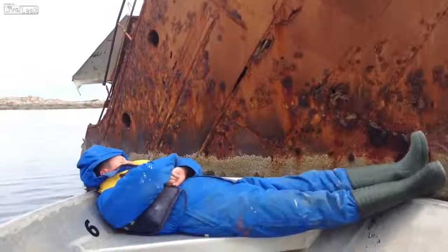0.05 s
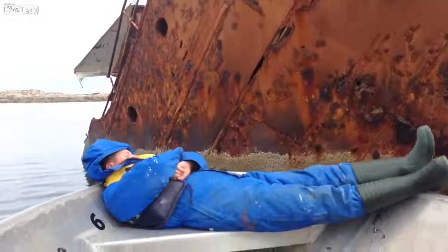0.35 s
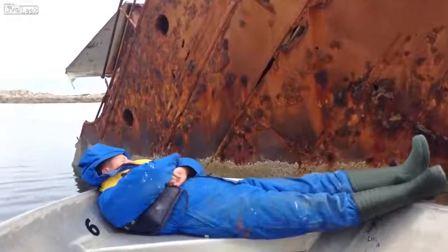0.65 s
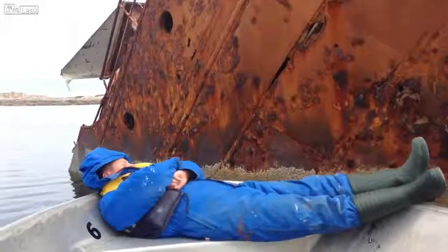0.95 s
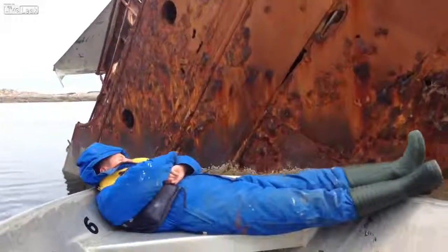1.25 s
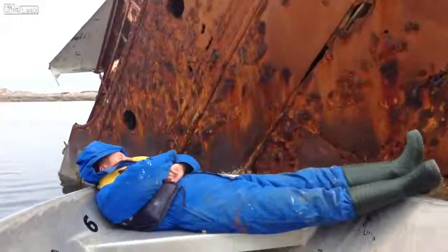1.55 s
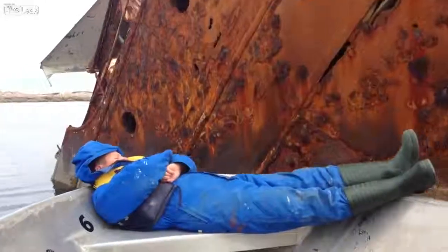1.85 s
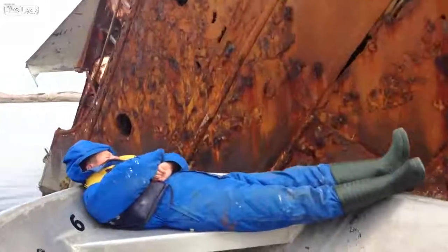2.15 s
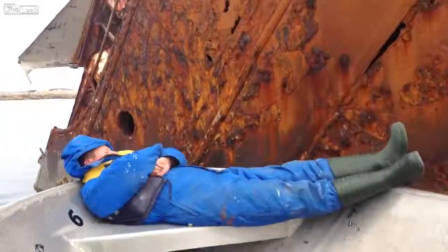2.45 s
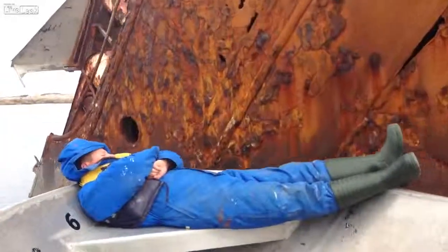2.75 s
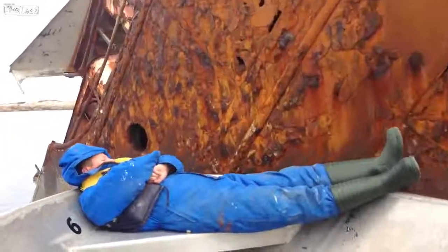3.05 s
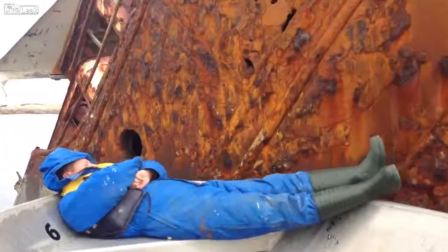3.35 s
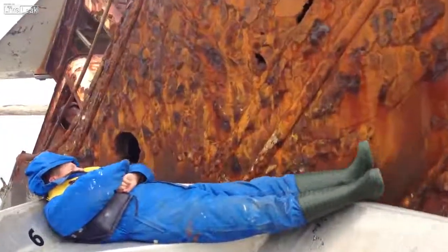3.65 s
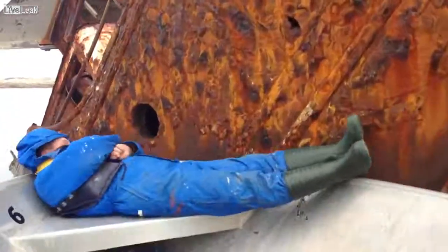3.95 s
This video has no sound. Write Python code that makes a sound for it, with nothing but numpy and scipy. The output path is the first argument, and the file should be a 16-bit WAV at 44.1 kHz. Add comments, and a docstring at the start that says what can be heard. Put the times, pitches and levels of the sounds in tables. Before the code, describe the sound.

A small outboard motor rumbles at idle, swells briefly, then ticks over with a faint chirp. Water slaps and splashes the sides. At the end the metal boat booms against a steel hull and scrapes, heard from on board.

```python
"""On open water beside a rusty steel hull, inside a small aluminium boat that is creeping up to it.
The idling outboard shakes the boat's panels, swells briefly and churns the water, then ticks over
with a faint chirp each turn. Water splashes, slaps and bubbles along the sides. Near the end the bow
strikes the hull: the boat booms and its edge grinds along the rust, snapping off flakes."""
import sys
import numpy as np
from scipy import signal
from scipy.io import wavfile
from scipy.ndimage import uniform_filter1d

SR = 44100
rng = np.random.default_rng(int(sys.argv[2]) if len(sys.argv) > 2 else 0)


def file_out(sig):
    """Save sig as 16-bit WAV at sys.argv[1]."""
    # one column per channel
    cols = np.atleast_2d(sig).T
    # limit, then scale
    lim = np.clip(cols, -1, 1)
    pcm = np.round(lim * 32767).astype(np.int16)
    wavfile.write(sys.argv[1], SR, pcm)


N = 176400
T = np.arange(N) / SR


def amp(db):
    """Decibels to gain."""
    return 10 ** (np.asarray(db) / 20)


def unit(x):
    """Scales to rms 1."""
    return x / np.sqrt(np.mean(x ** 2) + 1e-20)


def steady(x):
    """Rides out slow swings of level, holding the rms near 1."""
    return x / np.sqrt(abs(uniform_filter1d(x ** 2, size=5000)) + 1e-20)


def curve(points):
    """Automation lane: straight lines between (seconds, value) points."""
    return np.interp(T, *np.transpose(points))


def noise():
    """White noise."""
    return rng.standard_normal(N)


def wobble(samples):
    """Random modulation of rms 1, smoothed over this many samples."""
    return unit(uniform_filter1d(noise(), samples))


def grains(per_s, spread_db):
    """Random clicks of uneven size, at rms 1."""
    size = amp(spread_db * np.minimum(rng.exponential(1, N), 4))
    return unit(size * rng.choice([-1, 1], N) * (rng.random(N) < per_s / SR))


def burst(start, fade_s, rise_s):
    """Envelope with a straight attack and an exponential fade."""
    t = np.maximum(T - start, 0)
    return np.minimum(t / rise_s, 1) * np.exp(-np.maximum(t - rise_s, 0) / fade_s)


def ping(start, hz, fade_s, rise_s):
    """A struck sine that dies away."""
    return burst(start, fade_s, rise_s) * np.sin(2 * np.pi * hz * (T - start))


def eq(x, points):
    """Minimum-phase EQ of unit energy: the (Hz, dB) points set only the tone."""
    size = 8192
    hz, db = np.transpose(points)
    bins_hz = abs(np.fft.fftfreq(size, 1 / SR))
    log_gain = np.log(amp(np.interp(np.log(bins_hz + 1), np.log(hz), db)))
    taps = np.fft.ifft(np.exp(np.conj(signal.hilbert(log_gain)))).real[:size // 2]
    return signal.oaconvolve(x, taps / np.linalg.norm(taps))[:N]


def resonate(x, hz, width_hz):
    """One resonance of gain 1."""
    r = np.exp(-np.pi * width_hz / SR)
    return 2 * signal.lfilter([1 - r], [1, -r * np.exp(2j * np.pi * hz / SR)], x).real


def band(x, hz, width_hz):
    """The same resonance twice, for steeper skirts."""
    return resonate(resonate(x, hz, width_hz), hz, width_hz)


def plating(x, t60_s=0.097, wet_db=-8.5):
    """Adds the dense, short ring of the boat's thin sheet metal."""
    t = T[:8000]
    tail = rng.standard_normal(len(t)) * amp(-60 * t / t60_s)
    wet = signal.oaconvolve(x, tail / np.linalg.norm(tail))[:N]
    return (x + amp(wet_db) * wet) / np.hypot(1, amp(wet_db))


# How hard the motor works. Each row: time in seconds, rumble level in dB.
MOTOR_EFFORT = [(0, -45.5), (.3, -45.5), (.65, -42.5), (.74, -26), (1.0, -30), (1.18, -29.5), (1.23, -36.5),
                (1.29, -31), (1.44, -35.5), (1.51, -30.5), (1.76, -39), (2.0, -38.5), (2.71, -41.5),
                (2.9, -40), (3.72, -41)]
# The revs. Each row: time in seconds, firings per second.
MOTOR_SPEED = [(0, 22), (.6, 23), (.8, 27.5), (1.4, 27), (1.8, 23), (4, 23)]
# Panels the motor shakes. Each row: pitch in Hz, width in Hz, gain in dB.
PANELS = [(104, 12, -4.5), (193.6, 7.5, -3.5), (261.2, 9.4, 1.5), (303.7, 14.6, 3), (633.7, 13, 7),
          (1260, 50, 0.5), (2900, 130, 2.5)]
# The rumble, dark at idle and brighter under load. Each row: frequency in Hz, relative gain in dB.
IDLE_EQ = [(20, -48.5), (60, -21), (100, -9), (130, -5.5), (190, -1.5), (270, -1), (340, -7.5),
           (430, -10.5), (520, -27.5), (640, -26.5), (800, -45), (2000, -50), (10000, -80)]
LOADED_EQ = [(20, -34.5), (80, -22.5), (100, -18.5), (125, -11.5), (185, -4.5), (290, -1), (350, -12),
             (470, -10.5), (540, -26.5), (640, -19), (760, -24), (1050, -33.5), (1270, -27), (1600, -42),
             (10000, -82)]
def motor(puff_s=0.0075, puff_floor=0.89, load_from_db=-40.5, load_span_db=14):
    """Each firing gives a thump and a puff of exhaust that shake the panels; load brightens them."""
    speed, effort_db = curve(MOTOR_SPEED), curve(MOTOR_EFFORT)
    firings = np.cumsum(speed * (1 + .15 * wobble(1500))) / SR
    thumps = unit(np.diff(np.floor(firings), prepend=0) * amp(1.5 * noise()))
    since_firing_s = (firings % 1) / speed
    puffs = unit(noise() * (puff_floor + np.exp(-since_firing_s / puff_s)))
    drive = unit(puffs + 0.33 * thumps)
    shaken = drive + sum(amp(db) * resonate(drive, hz, width) for hz, width, db in PANELS)
    load = np.clip((effort_db - load_from_db) / load_span_db, 0, 1)
    return amp(effort_db) * steady((1 - load) * eq(shaken, IDLE_EQ) + load * eq(shaken, LOADED_EQ))


# Low drones. Each row: start in seconds, end in seconds, pitch in Hz, level in dB.
HUMS = [(-.1, .6, 112.4, -47), (1.56, 1.831, 141, -37.5)]
def hums(fade_s=0.056):
    """The boat drones on one rough, low note for a moment."""
    return sum(amp(db) * np.clip(np.minimum(T - start, end - T) / fade_s, 0, 1)
               * steady(band(noise(), hz, width_hz=37)) for start, end, hz, db in HUMS)


# The chirp creeping in. Each row: time in seconds, relative level in dB.
CHIRP_FADER = [(0, -66), (1.6, -55), (2.1, -54), (2.6, -52), (3.2, -51.5), (3.75, -55)]
def chirp(turn_s=.0869, anchor_s=2.608, jitter_s=0.0069, width_s=0.013, pitch_hz=1380):
    """A faint, uneven squeak on each turn of the motor, every second one weaker."""
    turns = (T - anchor_s + jitter_s * wobble(3000)) / turn_s
    nearest = np.round(turns)
    gate = np.exp(-.5 * ((turns - nearest) * turn_s / width_s) ** 2)
    accent_db = np.where(nearest % 2, -2, -4)
    hz = pitch_hz + 42.3 * wobble(200)
    tone = np.sin(2 * np.pi * np.cumsum(hz) / SR) * (1 + 0.35 * wobble(250))
    return amp(curve(CHIRP_FADER) + accent_db + 0.5 * wobble(3000)) * gate * tone


# Swells of churned water. Each row: time in seconds, relative level in dB.
CHURN_FADER = [(0, -54.5), (.11, -56), (.2, -55), (.45, -54), (.5, -58), (.62, -58), (.68, -51.5),
               (.76, -49), (.99, -47.5), (1.18, -52), (1.3, -51), (1.47, -51.5), (1.54, -47.5),
               (1.58, -57.5), (2.0, -61), (2.63, -63.5), (3.64, -63.5), (3.72, -51)]
# Its frothy tone. Each row: frequency in Hz, relative gain in dB.
CHURN_EQ = [(60, -27), (400, 6.5), (900, 3), (1500, 0), (2000, -1.5), (3000, -1), (4400, -4.5), (5500, -10),
            (6500, -8.5), (7400, -15), (8500, -18.5), (9800, -37.5)]
def churn(trim_db=3, flutter_db=1.9):
    """Water stirred by the motor fizzes and rings in the plating."""
    fizz = unit(noise() + 0.63 * grains(per_s=2500, spread_db=6))
    fizz *= amp(flutter_db * wobble(400))
    return amp(curve(CHURN_FADER) + trim_db) * eq(plating(fizz), CHURN_EQ)


# A soft bed of water. Each row: frequency in Hz, relative gain in dB.
WASH_EQ = [(20, -5), (80, 0), (500, 4), (900, -4), (1600, -7.5), (2600, -13.5), (4500, -14.5),
           (7000, -20.5), (10000, -31.5)]
def wash(level_db=-57):
    """The steady hush of open water."""
    return amp(level_db) * eq(noise(), WASH_EQ)


# Swishes of spray. Each row: start in seconds, fade in seconds, level in dB.
SWISHES = [(0.035, 0.031, -43.5), (0.516, 0.013, -50.5), (1.49, .035, -48.5)]
# Their airy tone. Each row: frequency in Hz, relative gain in dB.
SWISH_EQ = [(300, -13.5), (1500, -4.5), (3400, -4), (5500, -6), (7500, -12.5), (10000, -29.5)]
def spray():
    """Fine drops land in short, hissing showers."""
    envelope = sum(amp(db) * burst(start, fade_s, rise_s=0.0097) for start, fade_s, db in SWISHES)
    return eq(envelope * grains(per_s=5400, spread_db=3.5), SWISH_EQ)


# Dull knocks. Each row: start in seconds, pitch in Hz, level in dB.
KNOCKS = [(0.184, 166, -24), (.884, 235, -23.5), (1.0, 271, -21.5), (1.04, 110, -29), (1.665, 150, -27),
          (3.661, 178, -25)]
def knocks():
    """Low thuds in the boat, a few cycles each."""
    return sum(amp(db) * ping(start, hz, fade_s=0.0054, rise_s=0.0037) for start, hz, db in KNOCKS)


# Tiny plinks. Each row: start in seconds, starting pitch in Hz, level in dB.
BUBBLES = [(0.52, 3230, -45.5), (1.384, 4050, -49), (1.453, 2720, -47), (1.575, 1850, -46),
           (1.671, 1845, -40.5), (1.741, 2600, -46.5), (1.896, 2810, -46.5), (2.141, 1770, -49)]
def bubbles():
    """Each small bubble rings briefly, bending up in pitch."""
    return sum(amp(db) * ping(start, hz * (1 + 2.5 * (T - start)), fade_s=.007, rise_s=0.0024)
               for start, hz, db in BUBBLES)


# Slaps of water. Each row: start in seconds, fade in seconds, level in dB.
SLAPS = [(0.739, 0.046, -37), (1.507, 0.06, -37.5), (1.904, 0.066, -33.5), (3.655, 0.014, -44)]
# Their hollow tone. Each row: frequency in Hz, relative gain in dB.
SLAP_EQ = [(40, -32), (150, 5), (420, 3), (600, -8.5), (950, -9.5), (1250, -14), (1700, -22),
           (10000, -50.5)]
def slaps():
    """Water slaps under the bow in dull bursts of noise."""
    envelope = sum(amp(db) * burst(start, fade_s, rise_s=.017) for start, fade_s, db in SLAPS)
    return eq(envelope * noise(), SLAP_EQ)


# Small splashes. Each row: start in seconds, level in dB.
SPLASHES = [(1.499, -51), (1.571, -41.5), (1.61, -44.5), (1.669, -50), (1.738, -48), (1.767, -52),
            (1.794, -49), (1.824, -63), (1.954, -50), (2.078, -48), (2.108, -52), (2.139, -47.5),
            (2.291, -53), (2.41, -51.5), (3.671, -53)]
# Their wet midrange. Each row: frequency in Hz, relative gain in dB.
SPLASH_EQ = [(300, -19.5), (1200, 2), (1850, 8), (2300, -1.5), (3000, 2.5), (4500, -15), (10000, -57.5)]
def splashes():
    """Water breaks against the side in quick spatters."""
    envelope = sum(amp(db) * burst(start, fade_s=0.017, rise_s=0.0027) for start, db in SPLASHES)
    return eq(envelope * grains(per_s=5000, spread_db=1.8), SPLASH_EQ)


# Surges of grinding. Each row: time in seconds, relative level in dB.
GRIND_FADER = [(3.745, -46), (3.756, -32), (3.761, -23), (3.778, -23.5), (3.79, -23), (3.804, -17.5),
               (3.83, -25.5), (3.843, -35), (3.862, -22.5), (3.89, -25), (3.916, -33), (3.945, -29),
               (3.966, -41.5), (3.975, -30), (4, -31)]
# The bow's bright ring. Each row: pitch in Hz, width in Hz, relative gain in dB.
BOW_RINGS = [(1730, 60, 4), (2760, 40, -2), (3200, 160, -8), (3660, 40, 0), (4600, 180, 1.5),
             (5100, 90, -1)]
# The rasp of rust. Each row: frequency in Hz, relative gain in dB.
RUST_EQ = [(100, -20), (500, -3.5), (1000, 1.5), (1600, -2.5), (2600, 4), (4600, 1), (5600, -3),
           (7200, -12.5), (8500, -17), (10000, -48)]
def scrape(trim_db=-2.5, bow_db=-7, clump_db=0.87):
    """Rust flakes snap in clumps under the bow and ring its thin metal."""
    flakes = unit(grains(per_s=2500, spread_db=-0.5) + .5 * noise())
    flakes *= amp(clump_db * wobble(130))
    touching = T > GRIND_FADER[0][0]
    drive = flakes * amp(curve(GRIND_FADER) + trim_db) * touching
    rings = sum(amp(db + bow_db) * resonate(drive, hz, width) for hz, width, db in BOW_RINGS)
    return eq(plating(drive) + rings, RUST_EQ)


# Bright crunches. Each row: start in seconds, fade in seconds, centre in Hz, level in dB.
SNAGS = [(3.7565, .003, 5250, -25), (3.799, 0.0098, 6650, -26), (3.8492, 0.003, 4600, -22),
         (3.865, .003, 4600, -21), (3.879, 0.0095, 4730, -26.5), (3.893, 0.0024, 5350, -26),
         (3.935, 0.013, 7350, -48), (3.971, 0.0025, 4500, -30), (3.984, 0.0025, 4430, -27)]
def snags():
    """The bow catches on rust scale and breaks free."""
    grit = noise()
    return sum(amp(db) * burst(start, fade_s, rise_s=0.0011) * unit(band(grit, hz, width_hz=1020))
               for start, fade_s, hz, db in SNAGS)


# The boat's ringing body. Each row: pitch in Hz, relative level in dB, seconds to fall 60 dB.
BOAT_MODES = [(95, -30.5, 0.34), (121.8, -11, 0.8), (148.4, -7.5, 0.79), (179.5, -1, 0.49), (190, -1, 1),
              (205.1, 5.5, 0.67), (261, -15, 0.24), (294.3, -8, 0.53), (331.2, 3, 0.32), (364, -11, 0.35),
              (428, -14, 0.99), (652, -21.5, .3), (790, -27, 0.3), (1264, -15, 0.14)]
# The hard crack and the low shudder after it. Each row: frequency in Hz, relative gain in dB.
CRACK_EQ = [(20, -4), (45, 2), (80, -23), (250, -15), (500, 2.5), (780, 0.5), (980, -7.5), (1200, 8.5),
            (1500, -27.5), (1800, -1), (2300, -9.5), (4500, -11), (6500, -28), (10000, -52)]
SHUDDER_EQ = [(30, -33), (85, -19.5), (170, 2.5), (330, -1.5), (440, -6.5), (500, -15.5), (750, -19.5),
              (1300, -24.5), (2000, -27.5), (10000, -62)]
def collision(hit_s=3.7575, ring_db=-17, rubbed_db=-19):
    """The blow cracks, booms and rings the boat; the sliding contact keeps its panels shuddering."""
    crack = amp(-9) * eq(noise() * burst(hit_s, fade_s=0.0041, rise_s=0.0014), CRACK_EQ)
    rub = noise() * burst(hit_s, fade_s=0.27, rise_s=0.0022)
    ring = np.zeros(N)
    for hz, db, t60 in BOAT_MODES:
        fade_s = t60 / np.log(1000)
        tone = np.sin(2 * np.pi * (hz * (T - hit_s) + rng.random()))
        struck = burst(hit_s, fade_s, rise_s=0.0014) * tone
        rubbed = resonate(rub, hz, 1 / (np.pi * fade_s)) * np.sqrt(SR * fade_s)
        ring += amp(db) * (struck + amp(rubbed_db) * rubbed)
    push = amp(-20.5) * ping(hit_s, hz=42, fade_s=0.014, rise_s=0.0022)
    boom = amp(-13.5) * ping(hit_s, hz=184, fade_s=0.01, rise_s=0.011)
    shudder = amp(-18.5) * eq(rub, SHUDDER_EQ)
    return crack + push + boom + amp(ring_db) * ring + shudder


def scene():
    """Motor, water and the collision, heard in mono from inside the boat."""
    boat = motor() + hums() + chirp() + knocks()
    water = churn() + wash() + splashes() + spray() + slaps() + bubbles()
    impact = collision() + scrape() + snags()
    return (boat + water + impact)[None]


def record(dry, ceiling=.8, cutoff_hz=10100):
    """Soft-clips the peaks, then cuts the top end."""
    clipped = dry / (1 + (dry / ceiling) ** 4) ** (1 / 4)
    lowpass = signal.firwin(511, cutoff_hz, window=("kaiser", 9), fs=SR)
    return signal.oaconvolve(clipped, lowpass[None], "same")


dry = scene()
out = record(dry)
file_out(out)
```